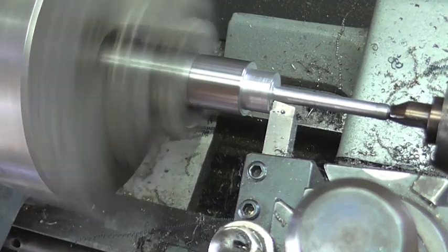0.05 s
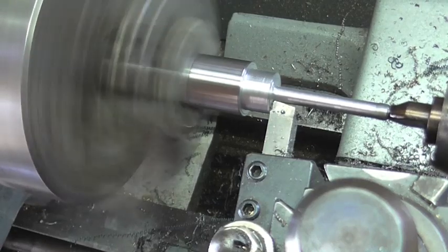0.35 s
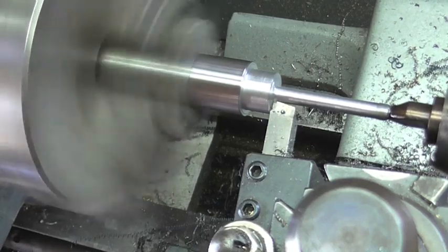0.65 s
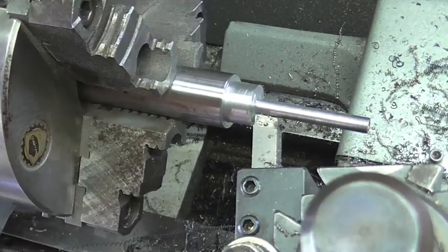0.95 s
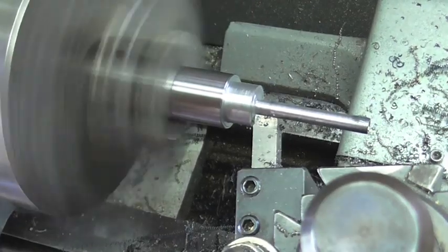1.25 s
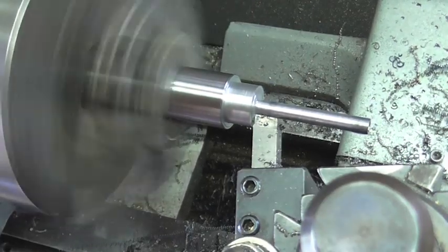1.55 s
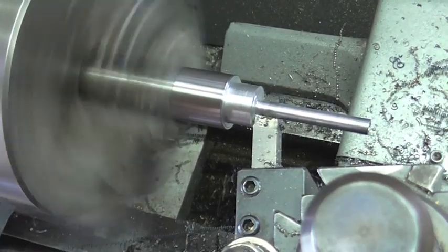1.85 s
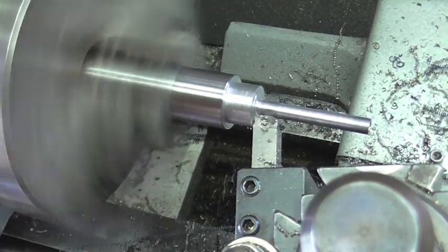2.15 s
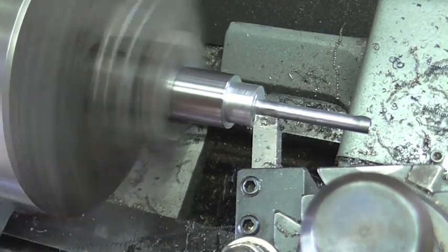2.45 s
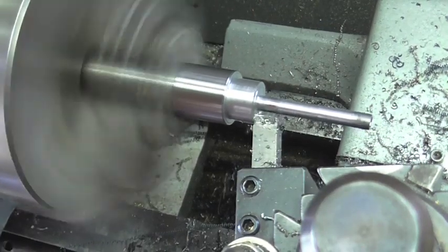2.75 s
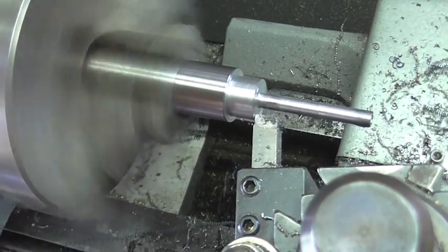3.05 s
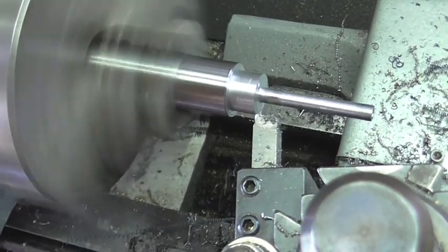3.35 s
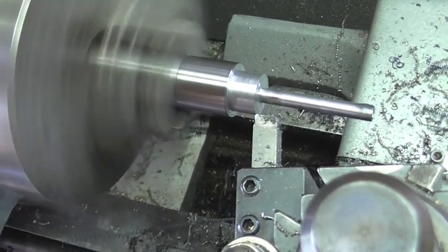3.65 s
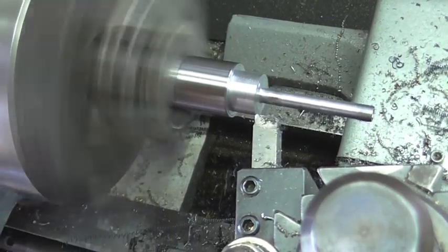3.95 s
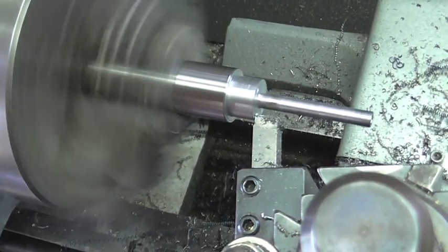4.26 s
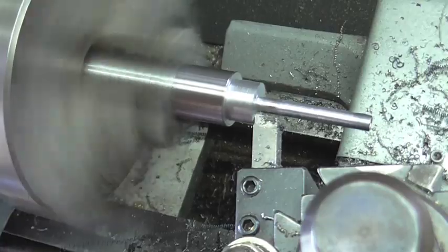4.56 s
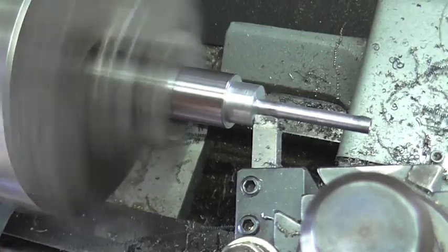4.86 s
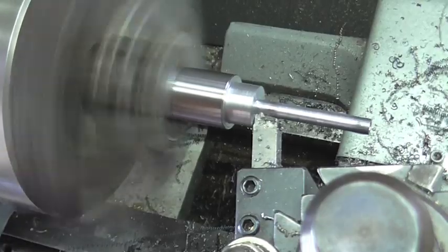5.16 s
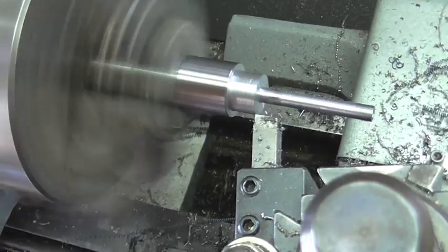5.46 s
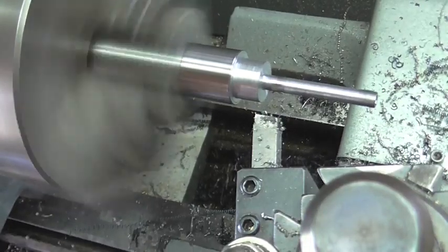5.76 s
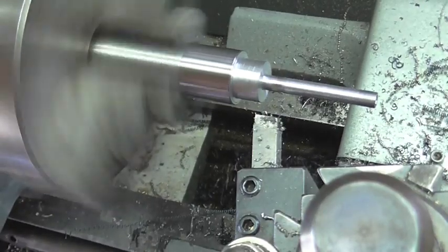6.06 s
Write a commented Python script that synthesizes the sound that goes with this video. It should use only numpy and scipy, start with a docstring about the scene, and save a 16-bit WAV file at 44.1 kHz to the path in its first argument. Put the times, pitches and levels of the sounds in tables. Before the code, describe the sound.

A lathe turning a steel bolt is heard from close by, humming with a fine squeal and tiny rapid chirps before fading away. After a brief quiet moment in the workshop, the drive engages with a clack. A steady motor whine follows, with pulsing gear tones, a bright rattle and a light hiss from the cut. Finally the power goes off and the loose gears run down, knocking several times.

```python
"""Metal lathe turning down a bolt

Two runs, heard close up in a workshop. The first hums and rumbles while the tool squeals on the steel and the
sticking chip chirps once a turn; it fades out. After a quiet moment the power comes on with a clack. The motor
whines, gear tones swell with each turn of the chuck, and knocking gears ring the headstock. With the power off,
the spindle runs down with a few last knocks."""
import sys
import numpy as np
from scipy import signal
from scipy.fft import rfft, irfft
from scipy.io import wavfile
from scipy.ndimage import uniform_filter1d

SR = 44100
rng = np.random.default_rng(int(sys.argv[2]) if len(sys.argv) > 2 else 0)


def dump(signal):
    """Clip the signal to [-1, 1] and save it as 16-bit WAV at the path in sys.argv[1]."""
    limited = np.clip(np.atleast_2d(signal).T, -1, 1)
    pcm = np.round(limited * 32767).astype(np.int16)
    wavfile.write(sys.argv[1], SR, pcm)


N = 278271
T = np.arange(N) / SR
FREQS = np.maximum(np.arange(N // 2 + 1) * SR / N, 1)
POWER_ON_S, POWER_OFF_S = 1.069, 6.066
FIRST_SPINDLE_HZ, SECOND_SPINDLE_HZ = 21.98, 7.786


def from_db(db):
    """Decibels to gain."""
    return 10 ** (np.asarray(db) / 20)


def unit_rms(x):
    """Scale to rms 1."""
    return x / np.sqrt(np.mean(x ** 2) + 1e-20)


def ramp(start_s, length_s):
    """Linear rise from 0 to 1."""
    return np.clip((T - start_s) / length_s, 0, 1)


def over_time(points):
    """A (seconds, value) curve at every sample."""
    return np.interp(T, *np.transpose(points))


def over_hz(points):
    """A (Hz, dB) curve at every frequency."""
    hz, db = np.transpose(points)
    return np.interp(np.log(FREQS), np.log(hz), db)


def coloured_noise(colour_db):
    """Noise with the given spectrum, rms 1."""
    return unit_rms(irfft(rfft(rng.standard_normal(N)) * from_db(colour_db), N))


def resonant_noise(hz, half_width_hz):
    """Noise ringing in one steep-sided resonance, rms 1."""
    return coloured_noise(-20 * np.log10(1 + ((FREQS - hz) / half_width_hz) ** 2))


def drift(rate_hz):
    """Random wander, mostly below rate_hz, rms 1."""
    return resonant_noise(0, rate_hz)


def tone(cycles):
    """Sine with a random start phase, rms 1."""
    return np.sqrt(2) * np.sin(2 * np.pi * (cycles + rng.random()))


def stereo_noise(force, colour_db, width):
    """Coloured friction noise under a force envelope, its width varying with frequency, rms 1."""
    mid, side = rfft(force * rng.standard_normal((2, N))) * from_db(colour_db)
    mid, side = irfft(mid, N), irfft(side * from_db(over_hz(width)), N)
    return unit_rms(np.array([mid + side, mid - side]))


def panned(x, left_db):
    """Mono to stereo, the left louder than the right by left_db."""
    return x * from_db([[left_db / 2], [-left_db / 2]])


# Each row: frequency in Hz, relative level in dB.
AIR_SPECTRUM = [(30, -40), (80, -25), (140, -23), (300, -15.5), (460, -0.5), (800, 0.5), (1000, 1),
                (1250, -2.5), (1500, -8.5), (3600, -8), (4800, -8), (6500, -3.5), (10000, -14),
                (15500, -25)]
# Each row: frequency in Hz, side re mid in dB.
AIR_WIDTH = [(60, -7), (250, -6), (450, -17), (1000, -13), (1300, -14), (1600, -5), (2500, -9), (4500, -30),
             (6300, -26), (8000, -6), (11000, -4), (15000, -14)]
# Each row: frequency in Hz, half-width in Hz, level in dB re the workshop level.
IDLE_RESONANCES = [(818, 7, -9), (1265, 37, -12.5), (2800, 65, -18), (4200, 160, -12)]


def workshop(idling, powered, floor_db=-76, idle_db=-54, running_db=-60.5):
    """Soft hiss, lower while the motor runs, and the rough resonances of the idling machine."""
    air = from_db(-2.5) * stereo_noise(1, over_hz(AIR_SPECTRUM), AIR_WIDTH)
    idle = sum(from_db(db) * resonant_noise(hz, half_hz) for hz, half_hz, db in IDLE_RESONANCES)
    fade_in = ramp(start_s=0.809, length_s=0.073)
    level = from_db(floor_db) + fade_in * from_db((1 - powered) * idle_db + powered * running_db)
    return level * (air + idling * idle)


# Each row: start in seconds, length in seconds, level in dB.
SCUFFS = [(0.787, 0.02, -52), (0.81, 0.0077, -56)]
# Each row: frequency in Hz, relative level in dB.
SCUFF_SPECTRUM = [(180, -63), (300, -33), (907, -21), (4650, -9), (5300, -15), (5760, -13), (10800, -19),
                  (15500, -25)]
# Shared by scuffs and rattle. Each row: frequency in Hz, side re mid in dB.
CONTACT_WIDTH = [(40, 2), (300, 0), (800, -15), (1450, -20), (1700, -16), (1950, -6), (2500, -48),
                 (4200, -76), (4600, -15), (4850, -6.5), (6100, -5), (6600, -22.5), (11000, -21),
                 (12200, -43)]


def scuffs():
    """Two short rubs between the runs."""
    rub = sum(from_db(db) * ((T > start) & (T < start + length)) for start, length, db in SCUFFS)
    return uniform_filter1d(rub, size=60) * stereo_noise(1, over_hz(SCUFF_SPECTRUM), CONTACT_WIDTH)


# Each row: start and end in seconds, start and end pitch in Hz, top level in dB.
FALLING_TONES = [(1.095, 1.95, 1253, 1145, -59), (2.2, 2.75, 1040, 985, -61), (2.253, 2.75, 823, 785, -64),
                 (3.7, 4.25, 1080, 1025, -52), (5.1, 6.1, 658, 631, -65)]


def falling_tones(waver_hz=5):
    """Faint tones that swell and fade as their pitch sinks."""
    out = 0
    for start, end, start_hz, end_hz, db in FALLING_TONES:
        progress = ramp(start, end - start)
        hz = start_hz + (end_hz - start_hz) * progress + waver_hz * drift(40)
        out += from_db(db) * np.sin(np.pi * progress) * tone(np.cumsum(hz) / SR)
    return out


# Each row: frequency in Hz, relative level in dB.
RUMBLE_SPECTRUM = [(30, -31), (85, -28), (135, -14), (200, -14.5), (300, -10), (480, -1), (850, 0.5),
                   (1020, -3.5), (2200, -6.5), (4100, -14), (5300, -25.5), (8300, -18.5), (11300, -21.5),
                   (15500, -27)]
# Each row: frequency in Hz, side re mid in dB.
RUMBLE_WIDTH = [(60, 1), (110, -11), (200, -10), (380, -4), (700, -19.5), (1290, -9.5), (2380, -10),
                (4400, -30), (8120, -56), (15000, -33)]


def rumble(turns, gain_db=-33, throb=0.16, grain_db=1.3):
    """Rough noise that throbs with the spindle."""
    force = (1 + throb * np.cos(2 * np.pi * turns)) * from_db(grain_db * drift(110))
    return from_db(gain_db) * stereo_noise(force, over_hz(RUMBLE_SPECTRUM), RUMBLE_WIDTH)


# Each row: frequency in Hz, level in dB.
HUM_LINES = [(131.5, -64.5), (240, -31), (299, -57), (358.5, -57), (478.9, -43.5), (537.5, -48),
             (596.8, -40.5), (656, -54), (719.7, -37.5), (777.7, -49), (834.3, -54), (877.7, -48),
             (960, -52), (1140.8, -53.5)]


def motor_hum(low_waver_db=0.285, high_waver_db=1.9):
    """The motor hums: nearly steady low lines, wavering upper ones."""
    hum = 0
    for hz, db in HUM_LINES:
        waver_db = low_waver_db if hz < 300 else high_waver_db
        hum += from_db(db + waver_db * drift(6.4)) * tone(hz * T)
    return panned(hum, left_db=-1.5)


# Each row: frequency in Hz, half-width in Hz, level in dB, flutter in dB.
SQUEALS = [(12450, 170, -47, 2.5), (13730, 230, -49.5, 2.5)]


def tool_squeal():
    """The tool squeals on the steel in thin, fluttering bands."""
    return sum(from_db(db) * unit_rms(resonant_noise(hz, half_hz) * from_db(flutter_db * drift(35)))
               for hz, half_hz, db, flutter_db in SQUEALS)


def chip_chirps(turns, hz=8420, waver_hz=120, sigma_s=0.0025, strong_db=-41.5, faint_db=-53, ease_s=0.27):
    """Once a turn the chip sticks and chirps, strongly at first, then faintly."""
    nearest = np.round(turns)
    scatter_db = 3 * np.clip(rng.standard_normal(N), -2, 2)[nearest.astype(int)]
    level = from_db(np.where(T < ease_s, strong_db, faint_db) + scatter_db)
    offset_s = (turns - nearest) / FIRST_SPINDLE_HZ
    blip = np.exp(-(offset_s / sigma_s) ** 2 / 2)
    return level * blip * tone(np.cumsum(hz + waver_hz * drift(400)) / SR)


def first_run(gain_db=0.5, first_chirp_s=0.018):
    """The machine and the cut hold their level, then fade out."""
    turns = FIRST_SPINDLE_HZ * (T - first_chirp_s)
    fade = (1 - ramp(start_s=0.68, length_s=0.091)) ** 1.15
    return from_db(gain_db) * fade * (rumble(turns) + motor_hum() + tool_squeal() + chip_chirps(turns))


# Each row: start in seconds, level in dB, decay in dB per second.
SIZZLES = [(2.03, -48.5, 9), (4.16, -53, 3)]


def chip_sizzle(force, hz=13050, half_width_hz=950, attack_s=0.06):
    """A chip catches on the tool and hisses in step with the gear knocks, dying away."""
    level = sum(ramp(start, attack_s) * from_db(db - decay * np.maximum(T - start, 0))
                for start, db, decay in SIZZLES)
    return level * unit_rms(resonant_noise(hz, half_width_hz) * force)


# Each row: time in seconds, clack level in dB, crack level in dB.
KNOCKS = [(1.0667, -22, -49.5), (1.0684, -21.5, -28), (1.0729, -20.5, -36), (6.191, -43, -48),
          (6.213, -37, -41), (6.241, -37, -44), (6.266, -54, -33), (6.275, -35, -60),
          (6.2781, -32, -36.5)]
# Each row: frequency in Hz, gain in dB, T60 in seconds.
CLACK_MODES = [(1800, -5, 0.037), (1964, -5, 0.016), (2110, -2, 0.029), (2420, -4.5, 0.019),
               (2770, -6, .018), (3540, -15, .018)]


def clacks(crack_t60_s=0.025, crack_low_hz=4500, body_low_hz=1400, spread_s=0.00062):
    """A clack as the power switches on, and the last knocks as the spindle runs down: each cracks brightly and
    rings short modes, slightly staggered."""
    clicks, crack = np.zeros(N) + 1e-18, np.zeros(N)
    for start, clack_db, crack_db in KNOCKS:
        clicks[round(start * SR)] = from_db(clack_db)
        crack += (T >= start) * from_db(crack_db - 60 * np.clip((T - start) / crack_t60_s, 0, 2))
    out = crack * coloured_noise(-10 * np.log10(1 + (crack_low_hz / FREQS) ** 4))
    for hz, db, t60_s in CLACK_MODES:
        radius, angle = np.exp(-np.log(1000) / (t60_s * SR)), 2 * np.pi * hz / SR
        feedback = [1, -2 * radius * np.cos(angle), radius ** 2]
        arriving = np.roll(clicks, int(rng.random() * spread_s * SR))
        out += from_db(db) * signal.lfilter([0, np.sin(angle)], feedback, arriving)
    # small stiff parts radiate no bass
    return signal.sosfilt(signal.butter(4, body_low_hz, "high", fs=SR, output="sos"), out)


# Each row: mesh harmonic, level in dB, swell depth 0-1, place of the swell in the turn 0-1.
MESH_HARMONICS = [(5, -55.5, 0.8, 0.42), (6, -49.5, 0.82, 0.49), (7, -55, 1, 0.56), (8, -46, 0.8, .01),
                  (9, -46, 0.23, 0.13), (10, -41, 0.18, 0.23), (11, -49.5, 0.8, 0.13), (12, -50, 1, 0.28),
                  (13, -47, 0.6, 0.1), (14, -50.5, .25, 0), (15, -48.5, 0.05, 1), (16, -56, 0, 0.1),
                  (17, -62, .1, .1)]


def gear_tones(turns, mesh_hz=238.9, gain_db=-3.5, runout_cycles=0.0095, waver_db=1.4):
    """Tooth mesh harmonics; a slightly eccentric wheel bends and swells them once a turn."""
    mesh_cycles = mesh_hz * T + runout_cycles * np.sin(2 * np.pi * turns) + 0.0055 * drift(4.2)
    out = 0
    for harmonic, db, depth, place in MESH_HARMONICS:
        swell = unit_rms(1 + depth * np.cos(2 * np.pi * (turns - place)))
        level = from_db(gain_db + db + waver_db * drift(35))
        out += level * swell * tone(harmonic * mesh_cycles + 0.052 * drift(25))
    return panned(out, left_db=0.17)


def gear_force(turns, speed, knock_hz=88.1, decay_s=0.0028, uneven_db=1.3, grain_db=1.0):
    """Contact force: quick uneven knocks, each a burst of grit, over steady rubbing."""
    rate_hz = knock_hz * speed
    cycles = np.cumsum(rate_hz) / SR + 0.03 * drift(15)
    cycles -= cycles.min()
    strength = from_db(uneven_db * np.clip(rng.standard_normal(N), -2, 2))[cycles.astype(int)]
    knocks = 0.99 * strength * np.exp(-(cycles % 1) / rate_hz / decay_s)
    ripple = 1 + 0.075 * np.cos(8 * np.pi * cycles)   # four lesser contacts per knock
    swell = 1 + 0.016 * np.cos(2 * np.pi * turns)
    grit = from_db(grain_db * drift(900) + 0.39 * drift(22))
    return (1 + knocks) * ripple * swell * grit


# Each row: frequency in Hz, relative level in dB.
RATTLE_SPECTRUM = [(30, -28.5), (130, -29), (330, -24.5), (560, -18), (900, -11), (1200, -9.5), (1800, -1),
                   (3400, 1), (4200, -1.5), (7000, -3.5), (10300, -7.5), (11300, -9.5), (13500, -8.5),
                   (15800, -14)]
# Each row: frequency in Hz, width in Hz, lift under power in dB.
HEADSTOCK_MODES = [(1764, 82, 6), (1964, 133, 6), (2280, 74, -1.5), (2880, 220, 4), (3230, 33, 5),
                   (3505, 134, 6.5), (4270, 95, -3.5), (4530, 170, 5), (5800, 110, -3), (6500, 94, 5),
                   (7260, 160, 4.5), (7720, 180, -3.5), (8150, 130, 1), (8480, 160, 7), (9650, 270, -1),
                   (9980, 190, 6), (10510, 120, 6.5)]


def gear_rattle(force, powered, gain_db=-37.5, coast_ring=1.36):
    """The knocking rings the headstock and chuck; unloaded gears ring more freely."""
    lift_db = sum(db / (1 + (2 * (FREQS - hz) / width_hz) ** 2) for hz, width_hz, db in HEADSTOCK_MODES)
    driven = stereo_noise(force, over_hz(RATTLE_SPECTRUM) + lift_db, CONTACT_WIDTH)
    coasting = stereo_noise(force, over_hz(RATTLE_SPECTRUM) + coast_ring * lift_db, CONTACT_WIDTH)
    rattle = np.sqrt(powered) * driven + np.sqrt(1 - powered) * coasting
    return from_db(gain_db) * panned(rattle, left_db=0.096)


# Each row: multiple of the whine pitch, relative level in dB, waver in dB, left minus right in dB.
WHINE_LINES = [(.547, -39, 4, -5), (1, 2.5, 0.76, -1.5), (1.38, -28, 1.5, 0), (2, -16.5, 3.5, 4),
               (2.5, -17.5, 3.5, 2.8), (3, -8, 2, 0.5), (3.25, -22, -5, -2.5), (3.75, -25.5, 5, -1),
               (4, -19.5, -1.5, -1), (14.88, -38, 2, 0)]
# Each row: time in seconds, gain in dB.
WHINE_SWELL = [(1.2, 0.5), (2.8, -.3), (3.5, 1), (4.0, .7), (4.6, -1.1), (5.2, 1), (6.06, -.5)]


def motor_whine(hz=960.2, gain_db=-37, surge_db=3.5, surge_s=1.12, surge_sigma_s=0.024):
    """Magnetic whine with wavering side tones, surging as the motor brings the chuck up to speed."""
    lines = sum(panned(from_db(db + waver_db * drift(22.4)) * tone(multiple * hz * T), left_db)
                for multiple, db, waver_db, left_db in WHINE_LINES)
    surge = np.exp(-((T - surge_s) / surge_sigma_s) ** 2 / 2)
    return from_db(gain_db + surge_db * surge + over_time(WHINE_SWELL)) * lines


# Each row: time in seconds, share of full spindle speed.
COAST_SPEED = [(6.07, 1), (6.16, .95), (6.31, .58)]
# Each row: start in seconds, end in seconds, depth in dB.
LEVEL_DIPS = [(1.967, 2.056, 6.5), (2.198, 2.425, 6.5), (2.249, 2.38, 4.5)]


def second_run(started, powered, loose_db=3, loss_db_per_halving=26, dip_fall_s=0.013, dip_rise_s=0.045):
    """The drive runs while the level dips briefly twice; unpowered, the gears rattle loose and quieten as they
    slow."""
    speed = over_time(COAST_SPEED)
    turns = SECOND_SPINDLE_HZ * T - np.interp(T, [2.0, 2.4], [0.11, 0])   # the once-a-turn pattern slips back in the dips
    drive = powered * (motor_whine() + gear_tones(turns))
    force = gear_force(turns, speed)
    run_down = from_db(ramp(POWER_OFF_S, 0.04) * (loose_db + loss_db_per_halving * np.log2(speed)))
    rattling = started * run_down * (gear_rattle(force, powered) + chip_sizzle(force))
    dip_db = sum(db * (ramp(start, dip_fall_s) - ramp(end, dip_rise_s)) for start, end, db in LEVEL_DIPS)
    return from_db(-dip_db) * (drive + rattling)


def scene():
    """Two runs of the lathe over the quiet workshop."""
    started = ramp(POWER_ON_S, 0.004)
    powered = started * (1 - ramp(POWER_OFF_S, 0.007))
    return (first_run() + workshop(1 - started, powered) + scuffs() + falling_tones()
            + clacks() + second_run(started, powered))


def record(dry, cutoff_hz=15950):
    """Steep low-pass on the top treble."""
    return signal.sosfilt(signal.ellip(12, 0.1, 80, cutoff_hz, fs=SR, output="sos"), dry)


dry = scene()
out = record(dry)
dump(out)
```